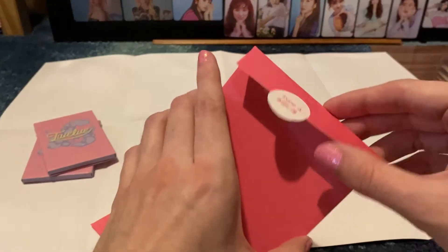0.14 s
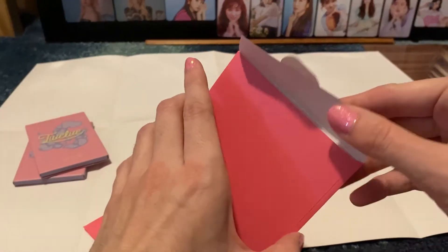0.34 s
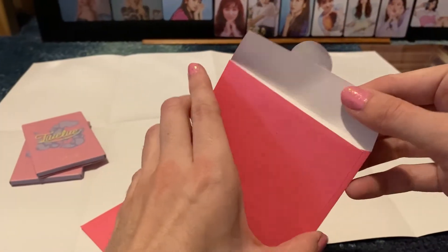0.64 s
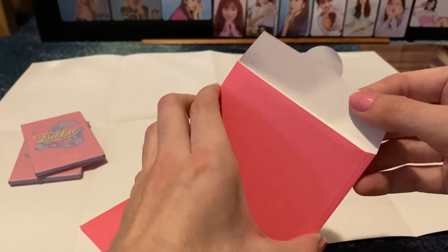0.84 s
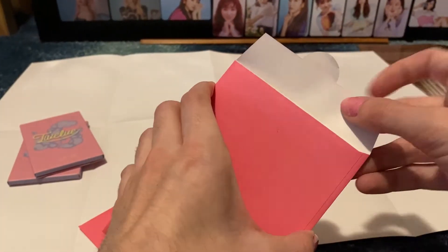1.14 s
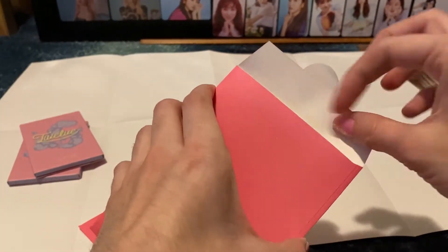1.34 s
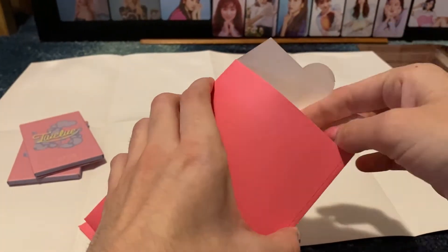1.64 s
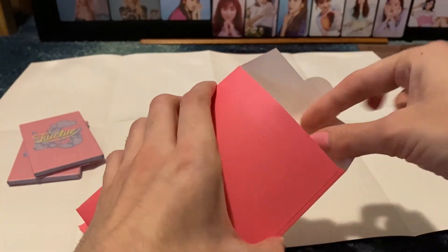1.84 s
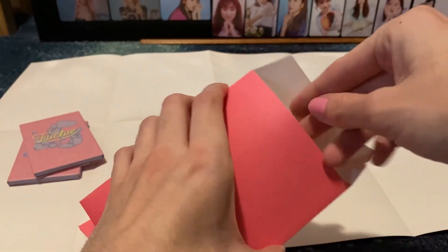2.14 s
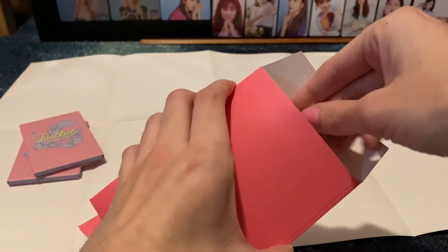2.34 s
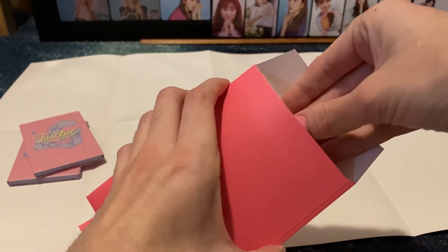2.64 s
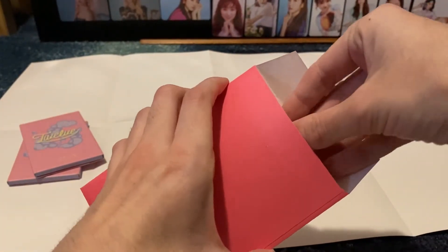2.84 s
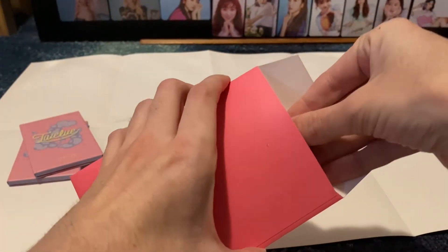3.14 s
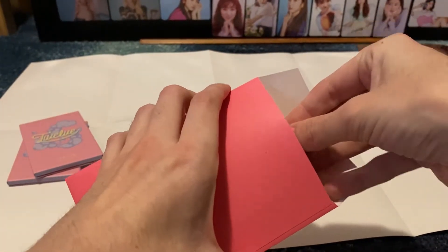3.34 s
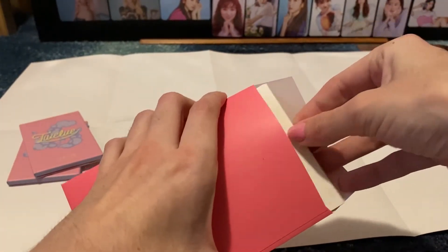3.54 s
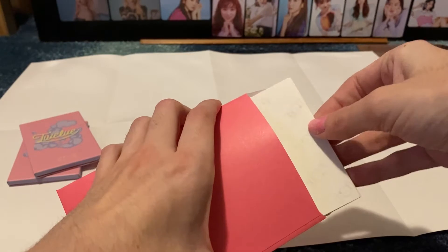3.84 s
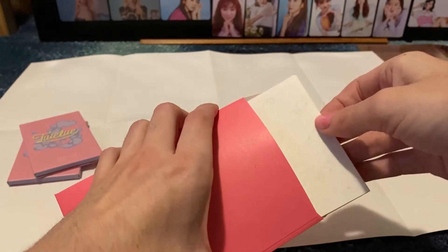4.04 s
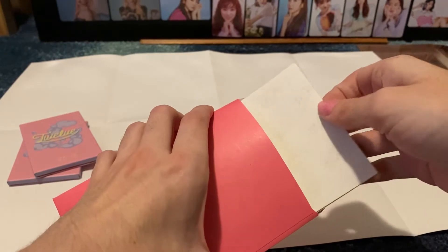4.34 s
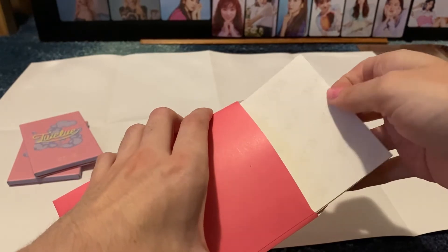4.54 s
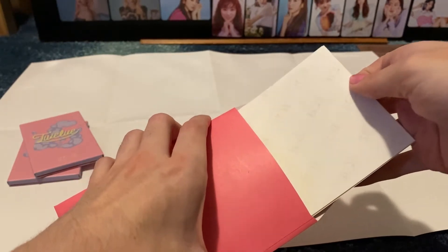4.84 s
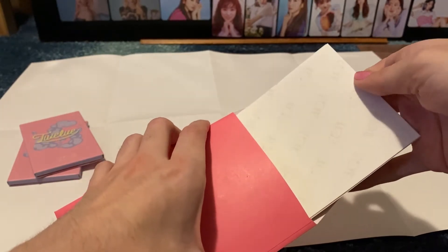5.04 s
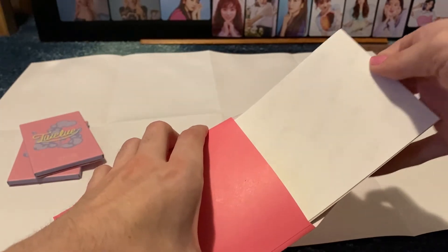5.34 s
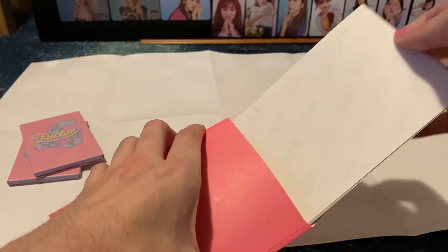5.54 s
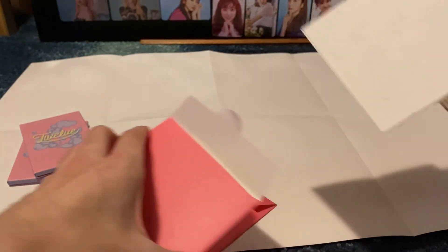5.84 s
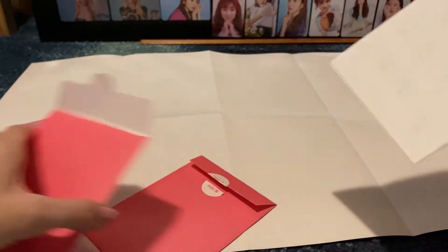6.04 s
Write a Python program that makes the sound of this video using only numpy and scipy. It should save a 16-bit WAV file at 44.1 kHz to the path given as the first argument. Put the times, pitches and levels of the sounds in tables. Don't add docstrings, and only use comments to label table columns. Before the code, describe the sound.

Very soft paper rubbing and tiny ticks come first, then a quick cluster of loud papery snaps at about one and a half seconds. After light fumbling, another hard flick thuds on the table. Crisp rustling and crease clicks follow, then longer dry sliding strokes as a card leaves the envelope. Recorded close on a table indoors, with little reverberation and faint room rumble.

```python
import sys
import numpy as np
from scipy import signal
from scipy.fft import rfft, irfft, next_fast_len
from scipy.io import wavfile
from scipy.ndimage import uniform_filter1d

SR = 44100
rng = np.random.default_rng(int(sys.argv[2]) if len(sys.argv) > 2 else 0)


def voltage_ratio(level):
    return 10 ** (np.asarray(level, float) / 20)


def store_wav(level_fs):
    pcm = np.round(np.clip(np.atleast_2d(level_fs), -1, 1) * 32767)
    wavfile.write(sys.argv[1], SR, pcm.T.astype(np.int16))


N = 273772


def unit(x):
    return x / np.sqrt(np.mean(x ** 2))


def peak_unit(x):
    return x / np.abs(x).max()


def colour(x, spectrum):
    hz, db = np.transpose(spectrum)
    size = next_fast_len(N, True)
    log_f = np.log(np.maximum(np.fft.rfftfreq(size, 1 / SR), 1))
    gain = voltage_ratio(np.interp(log_f, np.log(hz), db, left=-80))
    return unit(irfft(rfft(x, size) * gain, size)[:N])


def ring(x, hz, width_hz):
    return signal.lfilter(*signal.iirpeak(hz, hz / width_hz, SR), x)


def walk(rate_hz):
    k = int(SR / rate_hz)
    held = np.repeat(rng.standard_normal(N // k + 1), k)
    return 1.15 * uniform_filter1d(held, k // 2 + 1)[:N]


def slips(grit_db):
    return rng.standard_normal(N) * voltage_ratio(grit_db * np.minimum(rng.exponential(size=N), 5))


def wide(body, spread, grit_db):
    near = unit(body(slips(grit_db)))
    far = unit(body(slips(grit_db)))
    return near + spread * far * np.array([[1], [-1]])


# f/Hz, width/Hz, level/dB
POCKET_MODES = [(1150, 97, -7.5), (1440, 110, 1), (1650, 170, -1.5), (1853, 240, 0), (2230, 330, -0.5),
                (2584, 224, -1.5), (3050, 190, -10.5)]


def pocket(x, patchy_db=0):
    out = 0
    for k, (hz, width_hz, db) in enumerate(POCKET_MODES):
        if patchy_db:
            db = db + patchy_db * walk(14)
        out = out + (-1) ** k * voltage_ratio(db) * ring(x, hz, width_hz)
    return out


# firmest grip t/s, rise t/s, fall t/s, pocket level/dB, fibre hiss re pocket level/dB
FLAP = [(0.0, .01, 0.053, -70, 7), (0.15, 0.36, 0.29, -66, -5), (0.235, 0.11, 0.083, -70.5, 6),
        (0.37, 0.065, 0.09, -73.5, -6), (0.5, 0.11, .11, -73.5, 13.5), (0.56, 0.14, 0.026, -74, 3),
        (0.64, .08, .08, -87, 0), (0.705, 0.03, 0.069, -73.5, 10.5), (0.76, 0.067, 0.031, -70.5, -14),
        (0.858, 0.11, 0.032, -68, 8), (0.92, 0.046, .04, -71, -4), (1.018, .1, 0.048, -56.5, -2),
        (1.12, 0.12, 0.13, -65, 3.5), (1.256, 0.12, .07, -69.5, 6), (1.36, 0.15, 0.042, -83, 3.5),
        (1.44, 0.065, 0.012, -71, 1.5)]
JERKS = [
    (1.47, .017, 0.043, -55.5, 5.5),
    (1.51, .03, 0.012, -43.5, -4.5),
    (1.543, 0.023, 0.03, -41, -9.5),
    (2.153, 0.0043, 0.057, -55.5, -8.5),
    (2.214, .006, 0.043, -38, -12),
    (2.255, .035, 0.035, -48, -4),
    (2.943, 0.0075, 0.062, -56.5, -6),
]
FINGERS = [(1.632, 0.21, .075, -51.5, -3), (1.728, 0.029, 0.029, -57.5, -11.5),
           (1.808, 0.052, 0.04, -61.5, -6), (1.9, 0.17, 0.094, -73, -3.5), (1.99, 0.015, .03, -65, -8),
           (1.948, .01, .015, -70, -10), (2.035, .02, .03, -69, -8), (2.1, .05, .05, -82, -4),
           (2.06, 0.057, 0.046, -78.5, 5.5), (2.33, 0.028, 0.046, -53, -8), (2.374, 0.065, .08, -49, -6.5),
           (2.458, 0.19, .12, -49, -7), (2.597, .012, 0.059, -57.5, -5.5), (2.67, 0.021, 0.027, -64, -8),
           (2.7, 0.024, 0.022, -57.5, -3), (2.786, 0.083, 0.17, -56, -7), (2.97, .03, 0.12, -63.5, -5),
           (3.08, .05, .07, -79, -12.5), (3.178, 0.043, 0.069, -67, -16),
           (3.274, 0.045, 0.055, -57.5, -1.5), (3.32, 0.088, 0.041, -59.5, -17)]
PULL = [(3.37, 0.022, 0.076, -53, -5), (3.63, 0.2, 0.035, -49.5, -8), (3.724, 0.091, 0.075, -54.5, -8.5),
        (3.818, .045, 0.024, -52, -10.5), (4.336, 0.13, 0.095, -54, -9.5), (4.5, 0.02, 0.14, -55.5, -14),
        (4.684, 0.3, 0.11, -55, -9.5), (3.445, .035, .07, -56, -5), (3.85, .02, 0.053, -69, -13),
        (4.45, 0.052, 0.027, -65, -17)]
EDGE = [
    (3.89, 0.014, 0.14, -57.5, -7.5),
    (3.96, 0.03, 0.017, -51.5, -1),
    (3.985, .03, .25, -61, -5),
    (4.23, 0.063, 0.092, -60.5, -10.5),
    (5.98, 0.1, 0.1, -81, -4.5),
    (6.08, .05, 0.11, -72, -5.5),
    (6.16, 0.04, 0.095, -70.5, -1),
]
AWAY = [
    (4.82, 0.096, 0.033, -62, -7.5),
    (4.9, 0.076, 0.072, -60.5, -5.5),
    (5.01, 0.022, 0.069, -73.5, -7),
    (5.15, 0.04, 0.14, -75, -10),
    (5.31, 0.13, 0.065, -58.5, -5),
    (5.4, 0.1, 0.12, -61, -6),
    (5.548, .11, 0.051, -51.5, -5.5),
    (5.585, 0.04, 0.044, -66, -8),
]


def strokes():
    rest_db = -101
    # strokes, sheets re pocket/dB at a -60 dB grip, dB lost per dB of firmer grip
    handling = [(FLAP, -9.5, 0.28), (JERKS, 0.39, .05), (FINGERS, -8.5, 0.18),
                (PULL, -11.5, 0.3), (EDGE, -16.5, 0.314), (AWAY, -4.5, 0.33)]
    pointed = np.array([[1.075], [.8], [1]])
    t, power = np.arange(N) / SR, np.full((3, N), voltage_ratio(2 * rest_db))
    for rows, sheet_db, loss in handling:
        for s, rise, fall, db, hiss_db in rows:
            near = slice(max(int((s - rise) * SR), 0), int((s + fall) * SR))
            ramp = np.interp(t[near], [s - rise, s, s + fall], [0, 1, 0])
            top_db = db + np.array([0, sheet_db - loss * (db + 60), hiss_db])
            power[:, near] += (voltage_ratio(top_db)[:, None] * ramp ** pointed) ** 2
    return 10 * np.log10(power)


# f/Hz, level/dB per Hz
SHEET_SPECTRUM = [(150, -6), (300, -5), (600, 2), (1000, -1), (1500, -8), (2500, -28)]
# f/Hz, level/dB per Hz
FIBRE_SPECTRUM = [(3000, -28.5), (4500, -8), (5400, -1), (7000, -2), (10000, -8), (12500, -8), (15800, -16)]
# f/Hz, level/dB per Hz
GRAIN_SPECTRUM = [(1500, -6), (3000, -0.5), (3900, -1.5), (4800, -7.5), (6500, -24)]
# f/Hz, level/dB per Hz
TABLE_SPECTRUM = [(25, -29), (45, 7), (70, 3.5), (120, -1), (250, -6.5), (400, -33.5)]
# t/s, level/dB
HAND_WEIGHT = [(0.0, -62), (0.66, -80.5), (1.64, -66.5), (1.88, -74), (2.18, -74.5), (2.35, -64),
               (2.541, -68.5), (3.13, -71), (3.33, -68), (3.5, -74), (3.65, -69), (3.77, -75), (3.95, -68),
               (4.41, -78.5), (4.76, -69), (5.05, -73.5), (6.21, -73.5)]


def slide():
    db, sheet_db, fibre_db = strokes()
    sheet_db, fibre_db = sheet_db - db, fibre_db - db
    db = db + 1.2 * walk(120) + 0.73 * walk(35)

    hollow = wide(lambda x: pocket(x, patchy_db=2.6), 0.22, grit_db=2.5)
    hollow = hollow * voltage_ratio(0.64 * walk(25) - 2.5)
    sheet = wide(lambda x: colour(x, SHEET_SPECTRUM), .38, grit_db=3.5)
    sheet = sheet * voltage_ratio(sheet_db + 1.4 * walk(25) - 0.5)
    fibre = wide(lambda x: colour(x, FIBRE_SPECTRUM), 0.26, grit_db=3.0)
    fibre = fibre * voltage_ratio(fibre_db + 1.2 * walk(14) - 2.2)
    grain = wide(lambda x: colour(x, GRAIN_SPECTRUM), 0.24, grit_db=3.0)
    grain = grain * voltage_ratio(0.49 * fibre_db + 1.3 * walk(25) - 4.5)

    weight_db = np.interp(np.arange(N) / SR, *np.transpose(HAND_WEIGHT))
    table = wide(lambda x: colour(x, TABLE_SPECTRUM), .11, grit_db=3.0)
    table = table * voltage_ratio(weight_db + 0.38 * (db + sheet_db + 71.0) + 1.5 * walk(8.5))

    ticks = (rng.random(N) < 260 / SR) * rng.standard_normal(N)
    crackle = unit(pocket(ticks, patchy_db=3.5) + 0.25 * ring(ticks, 790, 600)) * voltage_ratio(-7.5)
    patches = 0
    for hz in (4210, 5370, 9700):
        patch = unit(ring(slips(2.5), hz, hz / 12))
        patches = patches + patch * voltage_ratio(.8 * fibre_db + 3.4 * walk(11) - 15.5)
    return voltage_ratio(db) * (patches + crackle + hollow + sheet + fibre + grain) + table


# t/s, peak level/dB, ring f/Hz, brightness level/dB, fade t/ms
FLICKS = [(1.4542, -33, 900, -16, 1.5), (1.4905, -27, 997, -20, 12), (1.5035, -26, 2900, -7, 18),
          (1.5235, -25, 1500, -34, 10), (1.5305, -15, 1440, -24, 17), (1.5435, -18, 1400, -27, 9),
          (2.151, -37, 1560, -5.5, 15), (2.189, -34, 720, -36, 10), (2.195, -34, 700, -34, 10),
          (2.2105, -21, 1520, -11, 10), (2.217, -25, 1430, -14, 12), (2.223, -27, 1320, -22, 9),
          (2.231, -34, 900, -14, 10), (2.245, -32, 1220, -14, 14), (2.308, -37, 1220, -8, 7),
          (2.923, -48.5, 704, -9, 7), (2.9415, -27.5, 1300, -11, 5.9), (2.944, -31, 1440, -34, 19)]
# t/s, peak level/dB, ring f/Hz, brightness level/dB
CREASES = [(0.051, -51.5, 520, -4), (0.065, -49.5, 536, -6), (0.242, -52, 759, -8), (0.995, -47, 2540, -14),
           (1.011, -56, 1650, -14), (1.608, -39, 1700, -15), (1.7285, -43, 1700, -34),
           (1.775, -49.5, 2000, -7), (1.804, -47.5, 3050, -17), (1.981, -56, 1410, -24),
           (2.049, -57, 2880, -6), (2.398, -35.5, 1890, -8), (2.587, -50, 1440, -26),
           (2.74, -46.5, 1390, -21), (2.785, -43.5, 2530, -16), (3.047, -49.5, 1540, -12),
           (3.22, -48.5, 1400, -22), (3.314, -45, 1650, -21), (3.363, -46, 1850, -25),
           (3.433, -47, 2500, -13), (3.639, -31.5, 2420, -16.5), (3.82, -39, 1510, -13),
           (3.882, -47.5, 1840, -4.5), (3.959, -33, 2430, -4.5), (4.598, -43, 1500, -30),
           (5.009, -52, 1510, -9.5), (5.038, -54, 1250, -19.5), (5.537, -52, 2300, -20),
           (5.579, -42.5, 2120, -13)]
# t/s, peak level/dB, ring f/Hz, brightness level/dB
MORE_CREASES = [(0.146, -56, 560, -14), (0.2, -58, 2100, -8), (1.461, -44, 600, -30), (1.497, -36, 1900, -20),
                (1.5265, -20, 1150, -30), (1.556, -38, 1900, -20), (1.626, -46, 1600, -20),
                (1.637, -43, 2000, -18), (1.686, -50, 2200, -20), (1.714, -51, 2000, -25), (1.723, -48, 2100, -25),
                (1.74, -51, 2000, -25), (1.79, -54, 2500, -20), (2.185, -44, 3200, -10), (2.257, -42, 2300, -14),
                (2.349, -43, 2200, -16), (2.367, -44, 2300, -16), (2.42, -43, 2100, -16), (2.444, -44, 2300, -16),
                (2.597, -54, 1440, -22), (2.63, -52, 1420, -22), (2.655, -57, 1930, -18), (2.687, -54, 2400, -16),
                (2.752, -46, 1450, -25), (2.8, -48, 2500, -18), (2.867, -54, 2120, -16), (3.242, -55, 1810, -14),
                (3.257, -50, 1900, -14), (3.275, -48, 2370, -14), (3.447, -48, 2470, -18), (3.475, -50, 1750, -20),
                (3.496, -48, 1800, -20), (3.58, -45, 2000, -18), (3.688, -49, 1990, -18), (3.72, -48, 2000, -18),
                (3.806, -51, 2040, -18), (4.435, -53, 1450, -22), (4.487, -52, 1980, -20), (4.496, -52, 1540, -22),
                (4.816, -56, 1560, -18), (5.229, -56, 1130, -18), (5.318, -49, 1450, -18), (5.361, -52, 1280, -18),
                (5.464, -54, 1150, -18)]


def snaps():
    size, crease_fade_ms = 4096, 13
    out, ms = np.zeros((2, N + size)), np.arange(size) / SR * 1000
    rows = [*FLICKS] + [(*row, crease_fade_ms) for row in [*CREASES, *MORE_CREASES]]
    grit = np.minimum(rng.exponential(size=(len(rows), 1, size)), 3)
    clicks = rng.standard_normal((len(rows), 4, size)) * voltage_ratio(2.5 * grit)
    treble = signal.butter(2, [3000, 9000], "band", fs=SR, output="sos")
    dull = signal.butter(2, 5500, fs=SR, output="sos")
    air = signal.butter(2, 5000, "high", fs=SR, output="sos")
    for (s, db, hz, bright_db, fade_ms), (a, b, c, d) in zip(rows, clicks):
        swell_ms = max(.2 * fade_ms, .1)
        decay = voltage_ratio(-40 * np.maximum(ms - swell_ms, 0) / max(fade_ms, 1))
        burst = np.minimum(ms / swell_ms, 1) ** 2 * decay
        soft_a, soft_b, soft_d = (signal.sosfilt(dull, x * burst) for x in (a, b, d))
        panel = peak_unit(ring(soft_a, hz, .2 * hz))
        hollow = peak_unit(pocket(soft_b))
        crack = peak_unit(signal.sosfilt(treble, c * burst))
        slap = peak_unit(ring(soft_d, 550, 500))
        sound = panel + 0.72 * hollow + voltage_ratio(bright_db + 7.0) * crack
        sound += 0.2 * voltage_ratio(-.3 * (bright_db + 16)) * slap
        far_crack = peak_unit(signal.sosfilt(air, a * burst))
        far = .22 * peak_unit(pocket(soft_d)) + voltage_ratio(bright_db - 6) * far_crack
        sound = sound + far * np.array([[1], [-1]])
        i = int((s - swell_ms / 2000) * SR)
        out[:, i:i + size] += voltage_ratio(db - 3.0) * sound
    return out[:, :N]


# start t/s, length
# t/s, f/Hz, width/Hz, level/dB
PANELS = [(0, 0.3, 2124, 150, -72), (0, 0.21, 3150, 400, -69), (0.235, .03, 900, 200, -64),
          (0.05, .04, 3600, 300, -70), (4.06, .1, 1000, 200, -78), (3.88, .025, 850, 200, -66),
          (0.027, 0.31, 850, 350, -74.5), (0, .15, 300.7, 100, -68.5), (0, 0.35, 527, 300, -70.5),
          (0.277, 0.12, 296.5, 83, -74), (0.822, 0.6, 291, 80, -74), (1.27, .14, 1530, 50, -82),
          (2.21, 0.049, 356.3, 230, -41.5), (2.582, 0.074, 1410, 120, -61.5),
          (2.734, 0.036, 1423, 120, -52.5), (3.904, 0.13, 1460, 110, -85),
          (1.799, 0.73, 12960, 5000, -81.5), (5.569, 0.048, 430, 220, -65), (5.545, .088, 216, 90, -64.5),
          (5.958, .08, 4900, 1300, -79), (6.032, 0.1, 5150, 1400, -75), (6.123, .11, 5100, 1500, -72)]
# start t/s, length t/s, f/Hz, width/Hz, level/dB, last f/Hz
CARD = (5.15, .42, 1400.5, 430, -62.5, 848)


def panels():
    out = np.zeros(N)
    for start, length, hz, width_hz, db, last_hz in [(*row, row[2]) for row in PANELS] + [CARD]:
        lowpass = signal.butter(2, width_hz / 2, fs=SR, output="sos")
        wobble = signal.sosfilt(lowpass, rng.standard_normal((2, 32768)))
        i, j = int(max(start, 0) * SR), min(int((start + length) * SR), N)
        phase = 2 * np.pi * np.cumsum(np.linspace(hz, last_hz, j - i)) / SR
        band = wobble[0, :j - i] * np.cos(phase) + wobble[1, :j - i] * np.sin(phase)
        out[i:j] += voltage_ratio(db) * unit(band) * signal.windows.tukey(j - i, .6)
    return out


# t/s, peak level/dB, fade t/ms
CRACKS = [(0.066, -60, 8), (1.506, -38, 10), (1.532, -40, 14), (1.774, -60, 8), (2.152, -48, 12),
          (2.2105, -32, 7), (2.2185, -28, 7), (2.2318, -33, 5), (2.24, -37, 5), (2.246, -38, 10),
          (2.9418, -40, 6), (2.305, -58, 5), (2.309, -50, 6)]


def cracks():
    size = 1024
    ms, out = np.arange(size) / SR * 1000, np.zeros(N + size)
    band = signal.butter(2, (4500, 15500), "band", fs=SR, output="sos")
    for (s, db, fade_ms), x in zip(CRACKS, rng.standard_normal((len(CRACKS), size))):
        envelope = np.minimum(ms / .6, 1) * voltage_ratio(-30 * ms / max(fade_ms, 1))
        spit = signal.sosfilt(band, x * envelope)
        i = int(s * SR)
        out[i:i + size] += voltage_ratio(db) * peak_unit(spit)
    return out[:N]


# t/s, peak level/dB, boom f/Hz
THUDS = [(0.049, -51, 110), (0.319, -61, 125), (1.106, -60, 57.1), (1.456, -39.5, 272), (1.468, -37.5, 201),
         (1.5, -35, 93), (1.528, -35, 246), (1.544, -29, 71), (1.792, -58, 68.2), (2.16, -49, 101),
         (2.196, -43, 138.5), (2.215, -31, 118), (2.228, -25, 82), (2.311, -45.5, 256), (2.412, -48.5, 204),
         (2.583, -56, 131), (2.784, -53.5, 131), (2.943, -47, 250), (3.824, -54.5, 118.5),
         (4.912, -55.5, 131), (5.013, -59, 72.8), (5.045, -60, 243), (5.155, -66, 63.7),
         (5.736, -46.5, 137.3), (5.747, -41, 63.65)]


def thuds():
    size, boom_t60_s, push_ms = 16384, .118, 3
    out, t = np.zeros(N + size), np.arange(size) / SR
    push = np.hanning(int(push_ms * SR / 1000) + 3)

    def mode(hz, t60_share):
        return np.sin(2 * np.pi * hz * t) * voltage_ratio(-60 * t / (boom_t60_s * t60_share))

    for s, db, hz in THUDS:
        boom = mode(hz, 0.84) + 0.15 * mode(1.4 * hz, 0.89) + 0.16 * mode(235, 0.43)
        boom = np.convolve(boom, push)[:size]
        i = int(s * SR)
        out[i:i + size] += voltage_ratio(db - 1.0) * peak_unit(boom)
    return out[:N]


def room(x):
    t60_s, wet_db = .28, -25
    t = np.arange(SR // 2) / SR
    tail = rng.standard_normal((2, len(t))) * voltage_ratio(-60 * t / t60_s) * np.minimum(t / 0.0025, 1)
    tail = signal.lfilter([.5], [1, -.45], tail)
    tail = tail / np.sqrt(np.sum(tail ** 2, axis=1, keepdims=True))
    return x + voltage_ratio(wet_db) * signal.fftconvolve(x, tail, axes=1)[:, :N]


# f/Hz, level/dB per Hz
HUM_SPECTRUM = [(25, -6), (55, 3), (110, -7.5), (250, -13.5), (500, -27), (3000, -36.5), (8000, -38),
                (16000, -53)]


def hum():
    mid, side = (colour(rng.standard_normal(N), HUM_SPECTRUM) for _ in range(2))
    side = signal.sosfilt(signal.butter(2, 350, "high", fs=SR, output="sos"), side)
    return voltage_ratio(-72 + 0.77 * walk(1.2)) * (mid + 0.44 * side * np.array([[1], [-1]]))


def scene():
    paper = slide() + snaps() + panels() + cracks()
    return room(paper) + thuds() + hum()


def band_limit(x):
    return signal.sosfilt(signal.butter(12, 16450, fs=SR, output="sos"), x)


# f/Hz, lead of the left/rad, left minus right level/dB
PORTS = [(0, 0, 0), (500, -.1, -1.8), (1100, -.2, -.3), (1900, 0, -1.2), (2800, .6, -2.2),
         (4200, .85, -1.3), (5000, -.45, -.5), (7050, 0, 0)]


def record(dry):
    knee_hz, step_hz, top_hz = 4150, 3130, 15800
    linger = .35
    hz, lead, left_db = np.transpose(PORTS)
    size = next_fast_len(N, True)
    f, side = np.fft.rfftfreq(size, 1 / SR), np.array([[.5], [-.5]])
    steps = np.pi * np.maximum(f - knee_hz, 0) / step_hz
    lead = np.interp(f, hz, lead) + steps - linger * np.sin(2 * steps) / 2
    balance = voltage_ratio(side * np.interp(f, hz, left_db))
    turn = np.exp(1j * side * lead) * balance * (f < top_hz)
    ports = irfft(rfft(dry, size) * turn, size)[:, :N]
    ports = signal.sosfilt(signal.butter(3, 50, "high", fs=SR, output="sos"), ports)
    return band_limit(ports)


dry = scene()
out = record(dry)
store_wav(out)
```